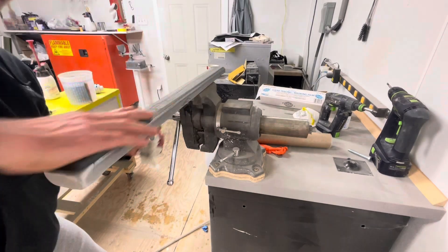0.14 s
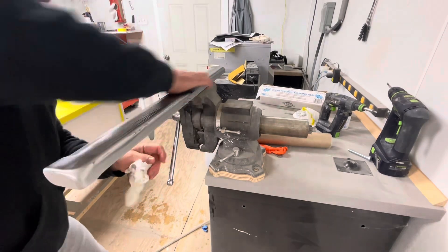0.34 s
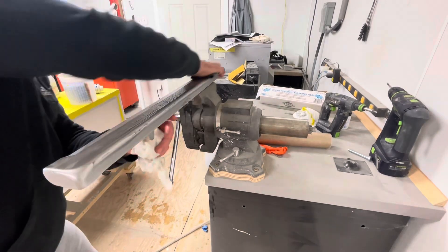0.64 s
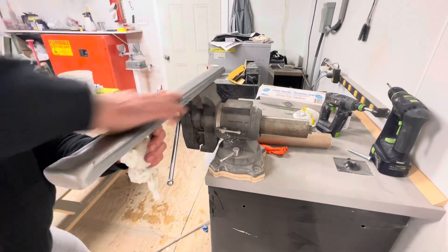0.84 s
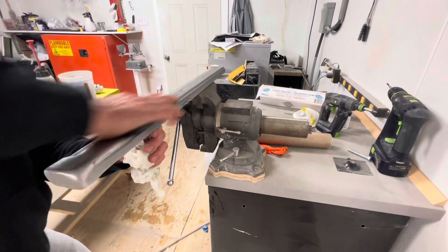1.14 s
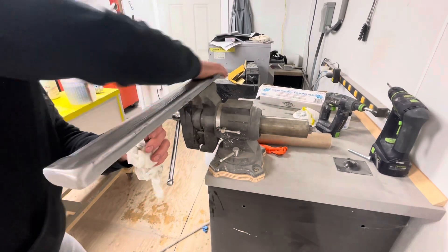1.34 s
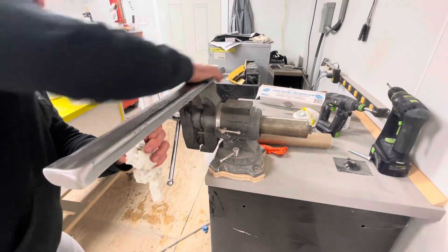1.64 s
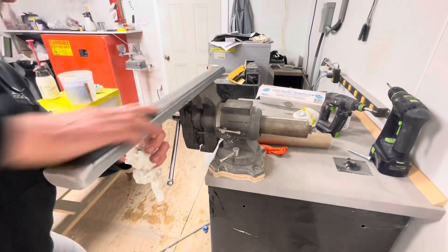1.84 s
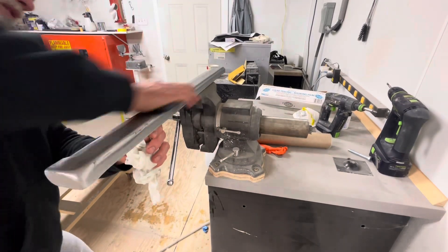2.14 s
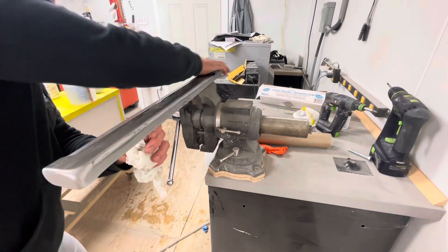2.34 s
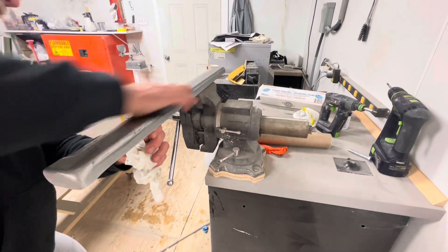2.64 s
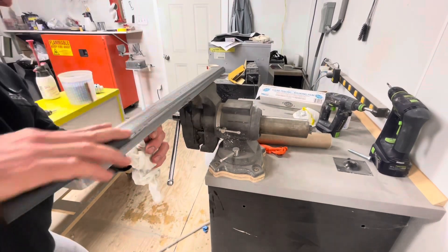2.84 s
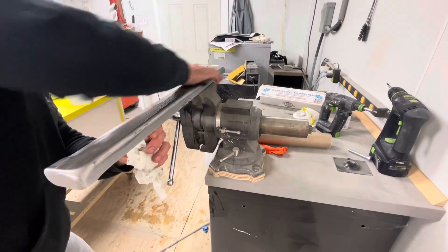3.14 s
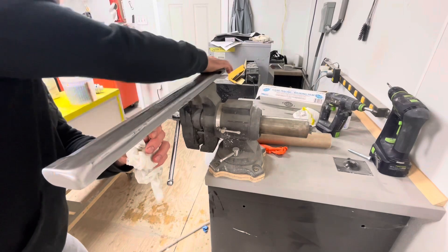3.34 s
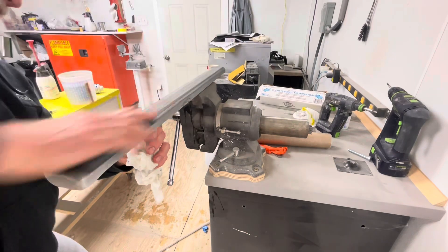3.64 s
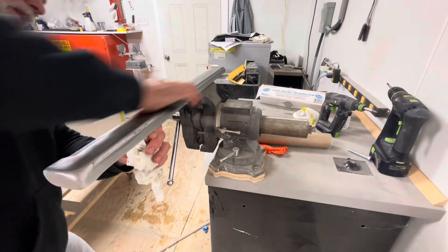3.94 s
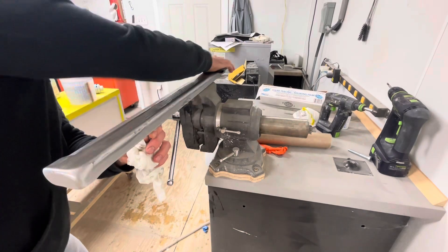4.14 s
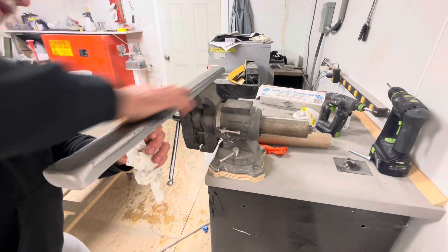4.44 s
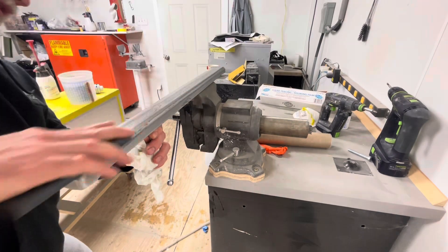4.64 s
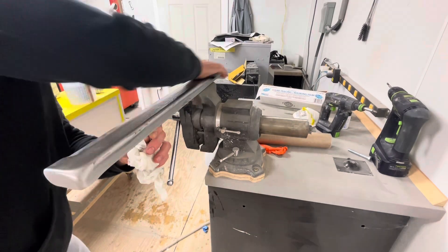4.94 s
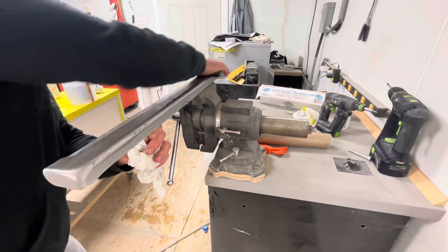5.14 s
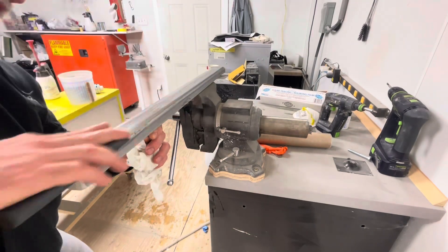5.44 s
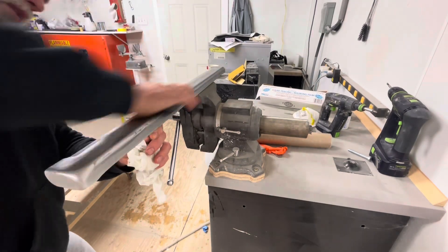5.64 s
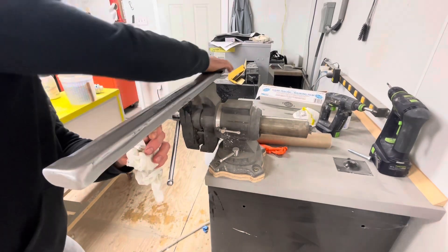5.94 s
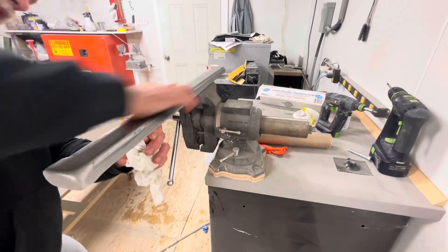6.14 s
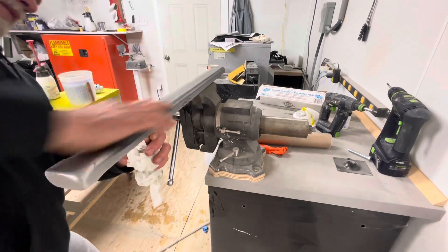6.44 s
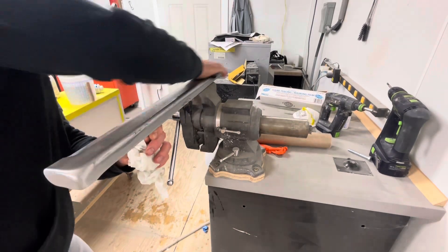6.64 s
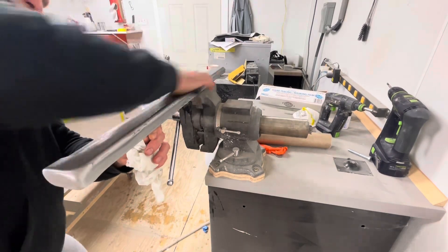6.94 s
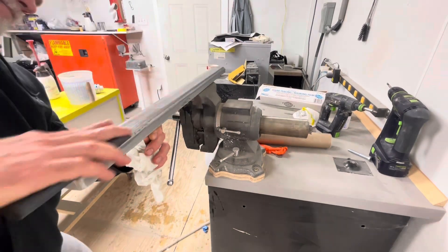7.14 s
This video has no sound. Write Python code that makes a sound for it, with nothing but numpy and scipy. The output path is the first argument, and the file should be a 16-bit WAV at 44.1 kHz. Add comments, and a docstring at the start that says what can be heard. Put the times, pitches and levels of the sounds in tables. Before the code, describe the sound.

In a small workshop, sandpaper under a hand scrapes up and down a metal bar held in a vice. Two strokes a second make bright, gritty hiss, dipping almost to nothing at each turn. A hollow tone rises faintly as the arm draws back. Soft low bench thuds and brief scuffs mark turns, over quiet fan hum. Close stereo microphone, short dry room.

```python
"""Sanding a steel bar

Sandpaper under a hand goes up and down a bar held in a vice, about one round trip a second.
Shaped noise and tiny bursts make hiss and crackle; two resonances crossfade into a hollow rising note.
Fan tones and air noise fill the small workshop, cloth rustles in noise swells,
the rocking bench thuds in decaying sines, and catching paper gives brief noise scuffs."""
import sys
import numpy as np
from scipy import signal
from scipy.fft import rfft, irfft, next_fast_len
from scipy.io import wavfile
from scipy.ndimage import uniform_filter1d, map_coordinates

SR = 44100
rng = np.random.default_rng(int(sys.argv[2]) if len(sys.argv) > 2 else 0)


def to_wav(s):
    """Save 16-bit WAV."""
    ch = np.atleast_2d(s).T  # columns
    pcm = np.round(np.clip(ch, -1, 1) * 32767)  # PCM
    wavfile.write(sys.argv[1], SR, pcm.astype(np.int16))


N = 321489
TIME = np.arange(N) / SR
TOP_HZ = 15800
CREEP = 0.13  # share of the rub left at a turn

# Strokes of the hand, in turn drawn back and pushed away. Each row: start in seconds, level in dB,
# lean of the arm in dB, treble bite in dB, level of the hollow at the start in dB.
STROKES = [(-0.36, -25, 5, -1.3, -33), (0.07, -26.5, 3, -1, -41), (0.527, -26, 4.5, -0.3, -44),
           (0.978, -25, 4, -1.3, -40), (1.473, -24.5, 3.5, 0.2, -42.5), (1.928, -23.5, 2.5, 1.1, -38),
           (2.393, -22.5, 4.5, -0.8, -39), (2.814, -21, 3.5, -1.2, -36), (3.293, -22.5, 5.5, -0.7, -38),
           (3.724, -22, 4, -0.9, -40), (4.171, -24.5, 5.5, -0.8, -39.5), (4.6, -22, 4, -1.6, -39),
           (5.042, -24.6, 5.5, 0.8, -38), (5.458, -23, 3.5, 0.2, -41.5), (5.927, -24.5, 5, 1.1, -39),
           (6.336, -25, 4.5, 0.5, -41.5), (6.782, -25.5, 2.5, 1.8, -43), (7.194, -29.5, 9.5, -3, -44)]


def amp(db):
    """Decibels to gain."""
    return 10 ** (np.asarray(db) / 20)


def unit(x):
    """x at rms 1."""
    return x / np.sqrt(np.mean(x ** 2) + 1e-20)


def along(points, hz, axis=1):
    """One column of a table of frequencies, read on a log axis."""
    cols = np.transpose(points)
    return np.interp(np.log(hz + 1), np.log(cols[0] + 1), cols[axis])


def curve(rows):
    """(seconds, value) rows as one value per sample."""
    return np.interp(TIME, *np.transpose(rows))


def wobble(knots_per_s):
    """A smooth random curve."""
    knots = rng.standard_normal(int(N * knots_per_s / SR) + 4)
    return map_coordinates(knots, [TIME * knots_per_s])


def filtered(x, response):
    """x times a response of frequency."""
    m = next_fast_len(N + SR // 2)
    return irfft(rfft(x, m) * response(np.fft.rfftfreq(m, 1 / SR)), m)[..., :N]


def white():
    """Two unrelated noises."""
    return rng.standard_normal((2, N))


def heard(pair, colour):
    """Two unrelated signals, coloured and spread over left and right, at rms 1."""
    # Each row: frequency in Hz, likeness of the channels 0-1, lag of the left in radians,
    # left minus right in dB.
    stereo = [(100, .99, 0, -1.5), (220, .92, .1, -1.8), (450, .55, .2, -1.1), (900, .35, 3.3, 2.4),
              (1800, .45, 3, .5), (3000, .33, 2.6, 2.9), (3900, .4, 0, 2.4), (4600, .15, 0, 3.2),
              (5300, .36, 3.3, 6.5), (6400, .5, 6.2, 4.8), (7600, .35, 6.3, 2.4), (8200, .35, 4, .7),
              (8800, .7, 6.5, 0), (9800, 1, 9.3, 0), (10500, 1, 9.6, 0), (11800, .97, 12.5, 0)]
    m = next_fast_len(N + SR // 4)
    hz = np.fft.rfftfreq(m, 1 / SR)
    alike, lag, tilt_db = (along(stereo, hz, axis=k) for k in range(1, 4))
    common, apart = rfft(pair, m) * np.sqrt([1 + alike, 1 - alike])
    left = amp(tilt_db / 2) * np.exp(-.5j * lag)
    gain = colour(hz) / np.hypot(abs(left), 1 / abs(left))
    spectra = np.array([(common + apart) * left, (common - apart) / left])
    return unit(irfft(gain * spectra, m)[:, :N])


def progress(last_turn_s=7.62):
    """Strokes done so far; whole numbers are the turns."""
    turns_s = [row[0] for row in STROKES] + [last_turn_s]
    return np.interp(TIME, turns_s, np.arange(len(STROKES) + 1))


def nearness():
    """Where the hand is: 0 at the far end of the bar, 1 at the near end."""
    return (1 - np.cos(np.pi * progress())) / 2


def speed():
    """The hand swings like a pendulum: 0 at the turns, 1 in mid stroke."""
    return np.abs(np.sin(np.pi * progress()))


def per_stroke(axis):
    """One column of the strokes, handed over smoothly at each turn."""
    return uniform_filter1d(np.transpose(STROKES)[axis][progress().astype(int)], SR // 20)


def grabs(axis):
    """The block rocks and the paper grabs for a moment: one column as short swells in dB."""
    # Each row: centre in seconds, level in dB, tilt towards the rasp in dB, half length to 1/e in seconds.
    grab_rows = [(1.194, 1, 1, 0.062), (2.113, 3, 0, 0.044), (3.036, 0.5, 3.3, 0.04),
                 (3.485, 1, 0.5, 0.045), (3.94, 1, 2, 0.03), (4.33, 3, -2, 0.025), (4.396, 0, 4.5, 0.027),
                 (4.928, 2.5, -6, 0.042), (5.04, 3, 2, 0.03), (5.27, 1.8, 6, 0.036), (6.164, 2, 2, 0.056),
                 (7.018, 3.5, 1.5, 0.022)]
    return sum(row[axis] * np.exp(-((TIME - row[0]) / row[-1]) ** 2) for row in grab_rows)


def rub(near, speed_power=0.66, lean_at=0.21, lean_width=0.22, near_db=-3,
        bite_rest_db=-4.5, bite_speed_db=2.5, bite_per_lean_db=0.65, bite_near_db=-1.5,
        rasp_db=2.2, rasp_mid_db=2.4, uneven_db=0.44, rocking_db=1, uneven_per_s=30):
    """Level, treble bite and tilt towards the rasp in dB, from the hand's speed and weight."""
    # the arm bears down at lean_at, in shares of a stroke from the near end
    reach = np.abs(progress() % 2 - 1)
    lean_db = per_stroke(axis=2) * np.exp(-((reach - lean_at) / lean_width) ** 2)
    sliding_db = 20 * np.log10(CREEP + (1 - CREEP) * speed() ** speed_power)

    level_db = per_stroke(axis=1) + sliding_db + lean_db + grabs(axis=1)
    level_db = level_db + near_db * (near - .5) + uneven_db * wobble(uneven_per_s)

    bite_db = per_stroke(axis=3) + bite_rest_db + bite_speed_db * speed()
    bite_db = bite_db + bite_per_lean_db * lean_db + bite_near_db * (near - .5)

    # the block lies flattest in mid bar
    flat_db = rasp_db + rasp_mid_db * speed() ** 2 + grabs(axis=2) + rocking_db * wobble(uneven_per_s)
    return level_db, bite_db, flat_db


def scratches(per_second, spread_db, energy_life_s):
    """Single grains catch and let go: tiny bursts of very uneven size."""
    sizes = amp(spread_db * np.minimum(rng.exponential(size=N), 6))
    energy = (rng.random(N) < per_second / SR) * sizes ** 2
    keep = np.exp(-1 / (energy_life_s * SR))
    return unit(np.sqrt(signal.lfilter([1], [1, -keep], energy)) * white())


def patches(z, size):
    """A random field over short-time spectra, smooth in pitch and time."""
    field = rng.standard_normal(z.shape[1:])
    for axis, width in enumerate(size):
        field = uniform_filter1d(uniform_filter1d(field, width, axis), width, axis)
    return unit(field)


def sanding(near, grain_db=-6, chatter_db=0.18, ring_db=1.5, ring_hz=2950, pan_db=4, patchy_db=1.27,
            dip_db=-5, dip_far_hz=3400, dip_near_hz=1780, dip_width_hz=1250,
            comb_db=0.6, far_delay_s=0.0007, near_delay_s=0.0012):
    """Countless grains hiss, the larger ones crackle, and the paper chatters as it drags."""
    # Grit on steel. Each row: frequency in Hz, relative level in dB per Hz.
    grit = [(900, -32), (2150, -13.5), (2400, -11), (2750, -5.5), (4400, -6.5), (5300, -2.5), (7200, -6),
            (8400, -6.5), (9400, -1), (10100, 1.65), (11400, -7.5), (12500, -17), (13400, -39),
            (15500, -55)]
    contact = white() + amp(grain_db) * scratches(per_second=2300, spread_db=2.0, energy_life_s=0.00025)
    scrape = heard(contact, lambda hz: amp(along(grit, hz)))
    hz, t, z = signal.stft(scrape, SR, nperseg=256)
    level_db, bite_db, flat_db = rub(near)
    hz, near = hz[:, None], np.interp(t, TIME, near)
    # a keener bite lifts the fine fizz
    db = np.interp(t, TIME, bite_db) * along([(6500, 0.17), (9300, 1.0)], hz)
    # broad contact trades upper hiss for lower rasp
    rasp = along([(3400, 0.8), (5600, 0.043), (7500, -0.32), (9300, -0.064)], hz)
    db = db + np.interp(t, TIME, flat_db) * rasp
    # a broad ring comes out towards the free, near end of the bar
    db = db + ring_db * (near - .5) * np.exp(-((hz - ring_hz) / 500) ** 2)
    # a dip slides down as the hand comes near
    dip_hz = dip_far_hz + (dip_near_hz - dip_far_hz) * near
    db = db + dip_db * np.exp(-((hz - dip_hz) / dip_width_hz) ** 2)
    # ever new spots of paper and steel meet
    db = db + patchy_db * patches(z, size=(3, 8))
    # the bench top mirrors the sound, a comb that sweeps as the hand travels
    delay_s = far_delay_s + (near_delay_s - far_delay_s) * near
    db = db + comb_db * np.cos(2 * np.pi * hz * delay_s)
    # the hiss drifts to the left as the hand comes near
    pan = pan_db * (near - .5) * along([(3500, 0.74), (5600, 1), (8000, 0)], hz)
    scrape = signal.istft(z * amp([db + pan / 2, db - pan / 2]), SR, nperseg=256)[1][:, :N]
    return scrape * amp(level_db + chatter_db * wobble(90))


def jolts(attack_s, life_s):
    """The envelope of all catches as strokes start: a quick rise and a short fall each."""
    # Each row: start in seconds, level in dB.
    catch_rows = [(1.5, -42), (1.955, -35), (2.425, -33), (2.828, -29), (3.745, -30.5), (4.625, -32.5),
                  (5.476, -29.5), (6.348, -31), (7.215, -37.5)]
    since = [(np.maximum(TIME - s, 0), db) for s, db in catch_rows]
    return sum(amp(db) * (1 - np.exp(-t / attack_s)) * np.exp(-t / life_s) for t, db in since)


def hollow_drive(speed_db=-6.5, stall_speed=0.22, catch_db=-7):
    """The hollow sounds most in a slow drag, fades at a turn and is jolted by each catch."""
    db = curve([(row[0], row[-1]) for row in STROKES]) + speed_db * speed()
    drag = amp(db) * (CREEP + (1 - CREEP) * np.tanh(speed() / stall_speed))
    return np.hypot(drag, amp(catch_db) * jolts(attack_s=0.0033, life_s=0.048))


def hollow(near, far_hz=1450, near_hz=1650, width_hz=230, level_db=1.0, flutter_db=1.9):
    """The rub sounds the hollow under the hand, which tightens as the arm draws back."""
    tint = [(700, 0.25), (1300, 0.35), (1850, 0.57), (2500, 0.87), (4500, .2)]  # Hz, gain

    def ring(centre_hz):
        """Noise through one resonance, fluttering in level."""
        def colour(hz):
            band = 1j * hz * width_hz / (centre_hz ** 2 - hz ** 2 + 1j * hz * width_hz)
            return band * along(tint, hz)
        return amp(flutter_db * wobble(55)) * heard(white(), colour)

    tight = near ** 2
    note = np.sqrt(1 - tight) * ring(far_hz) + np.sqrt(tight) * ring(near_hz)
    return amp(level_db) * hollow_drive() * note


def workshop(air_db=-43.0, waver_db=2, drift_rad=1.0):
    """A fan's tones, unsteady in level and phase, over the steady rush of its air."""
    # Each row: frequency in Hz, relative level in dB.
    fan = [(120.5, -59), (161, -59.5), (173, -59.5), (210, -60.5), (378.3, -58), (527, -67.5), (819, -70)]
    # Each row: frequency in Hz, relative level in dB per Hz.
    air_colour = [(25, -33), (37, -9), (52, -6), (80, 4.5), (108, -6), (170, 2.5), (225, -2.5), (295, -12),
                  (430, -4.5), (620, -12), (1300, -8.5), (3200, -8.5), (10000, -31.5), (14000, -54)]
    tones = 0
    for hz, db in fan:
        level = amp(db + waver_db * wobble(5.5)) * np.sqrt(2)
        tones = tones + level * np.sin(2 * np.pi * hz * TIME + drift_rad * wobble(6))
    air = heard(white(), lambda hz: amp(along(air_colour, hz)))
    return tones * amp([[-.8], [.8]]) + amp(air_db) * air


def cloth(flutter_db=0.5):
    """Sleeve and rag brush along in short, dull swells of noise."""
    # Each row: centre in seconds, level in dB, half length to 1/e in seconds.
    rustles = [(.02, -41.5, 0.09), (1.068, -39.5, 0.062), (2.04, -50, 0.1), (2.72, -61, .04),
               (4.673, -49, 0.048), (5.637, -49, 0.096)]
    # Each row: frequency in Hz, relative level in dB per Hz.
    cloth_colour = [(70, -15), (150, 1.5), (260, 0.5), (400, -10.5), (800, -2.5), (1300, -8.5), (4000, -54)]
    swell = sum(amp(db) * np.exp(-((TIME - s) / length_s) ** 2) for s, db, length_s in rustles)
    return swell * amp(flutter_db * wobble(70)) * heard(white(), lambda hz: amp(along(cloth_colour, hz)))


def bench(level_db=-7.5, attack_s=0.016):
    """Pushes on the bar rock the bench: its low modes ring as soft thuds."""
    # Each row: start in seconds, relative level in dB, extra weight of the lowest mode in dB.
    thuds = [(0.601, -32.5, 15), (1.491, -31, -2.5), (2.018, -27.5, -4), (2.45, -52, -15), (2.84, -26, -7),
             (3.339, -30.5, -2), (3.679, -33, 0), (4.231, -32, 6), (4.7, -29, -2), (5.052, -35, -2),
             (5.618, -32, -2), (5.95, -43, -3), (6.359, -28, -2), (6.84, -30, -4), (7.231, -24.5, -5)]
    # Each row: frequency in Hz, relative level in dB, 60 dB decay time in seconds.
    modes = [(54, -7, 0.21), (74.4, 1.5, 0.28), (87, -2.5, 0.16)]
    out, t = np.zeros(N + SR), np.arange(SR // 2) / SR
    for s, db, weight_db in thuds:
        ring = 0
        for k, (hz, mode_db, t60_s) in enumerate(modes):
            fall_db = mode_db + weight_db * (k == 0) + rng.normal(0, 1.2) - 60 * t / t60_s
            ring = ring + amp(fall_db) * np.sin(2 * np.pi * (hz * t + rng.random()))
        out[round(s * SR):][:len(t)] += amp(db + level_db) * ring * (1 - np.exp(-t / attack_s))
    return out[:N] * amp([[-.8], [.8]])


def catches(attack_s=0.0017, life_s=0.028, level_db=-1):
    """Stuck paper breaks loose with a brief, crisp scuff."""
    # Each row: frequency in Hz, relative level in dB per Hz.
    scuff = [(900, -29), (1600, 2), (2150, 5), (3000, 11), (5500, -12), (9000, -20), (13000, -40)]
    return amp(level_db) * jolts(attack_s, life_s) * heard(white(), lambda hz: amp(along(scuff, hz)))


def echo(x):
    """The walls answer with a decaying noise tail; the middle pitches last longest."""
    # Each row: frequency in Hz, 60 dB decay time in seconds.
    room = [(300, 0.064), (3000, 0.2), (12000, 0.02)]
    hz, t, z = signal.stft(rng.standard_normal(SR // 2), SR, nperseg=256)
    tail = signal.istft(z * amp(-60 * t / along(room, hz)[:, None]), SR, nperseg=256)[1]
    return signal.fftconvolve(x, tail[None] / np.linalg.norm(tail), axes=1)[:, :N]


def scene(wet_db=-19):
    """The work at the vice, in its room."""
    # The background sinks a little over the work. Each row: time in seconds, level in dB.
    calm = [(0, 2), (2, 2.2), (4.3, 0.2), (7.3, 0.5)]
    near = nearness()
    work = sanding(near) + hollow(near) + catches()
    return work + amp(wet_db) * echo(work) + amp(curve(calm)) * workshop() + cloth() + bench()


def record(dry):
    """Nothing at or above TOP_HZ is kept."""
    return filtered(dry, lambda hz: hz < TOP_HZ)


dry = scene()
out = record(dry)
to_wav(out)
```